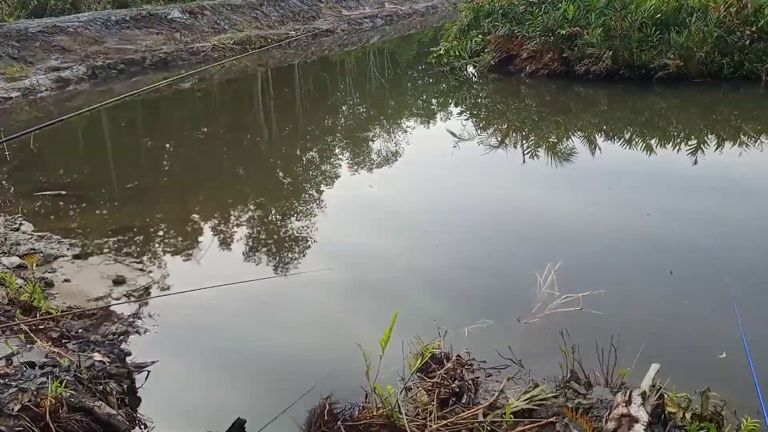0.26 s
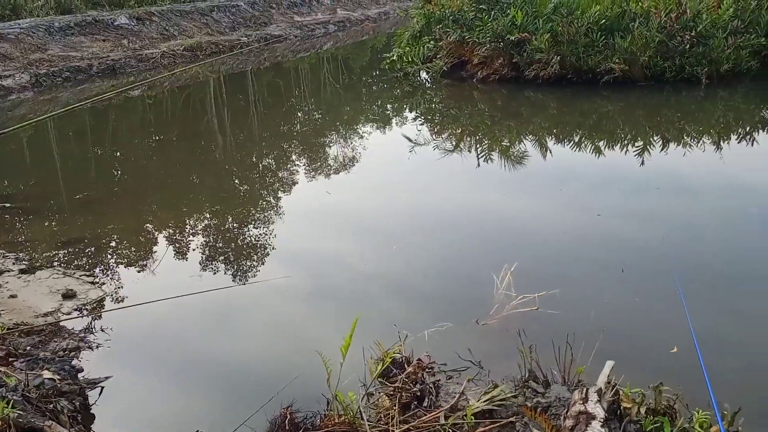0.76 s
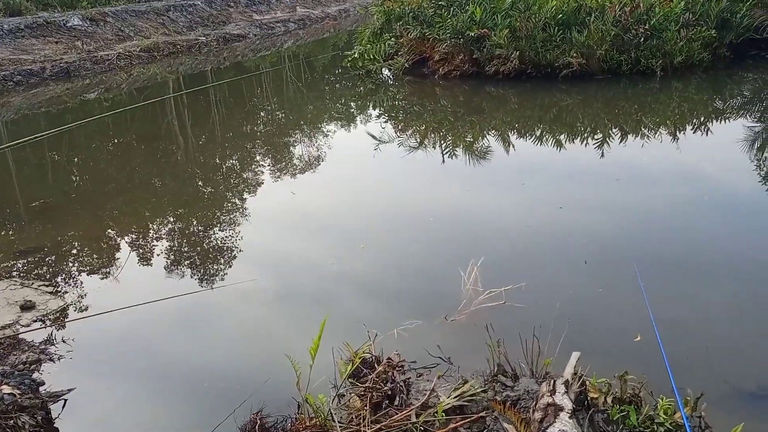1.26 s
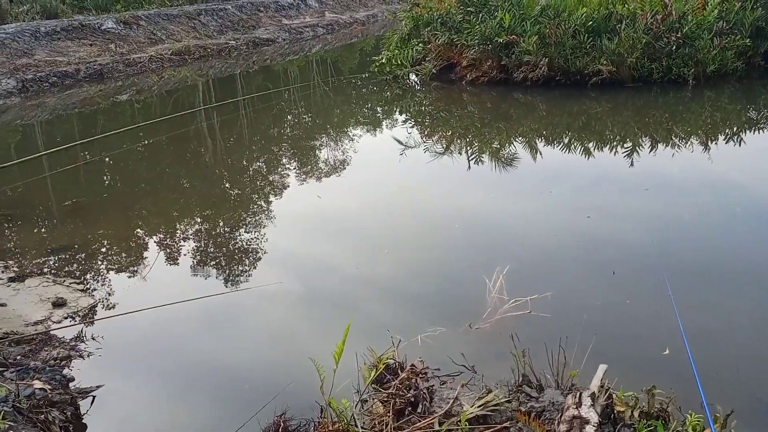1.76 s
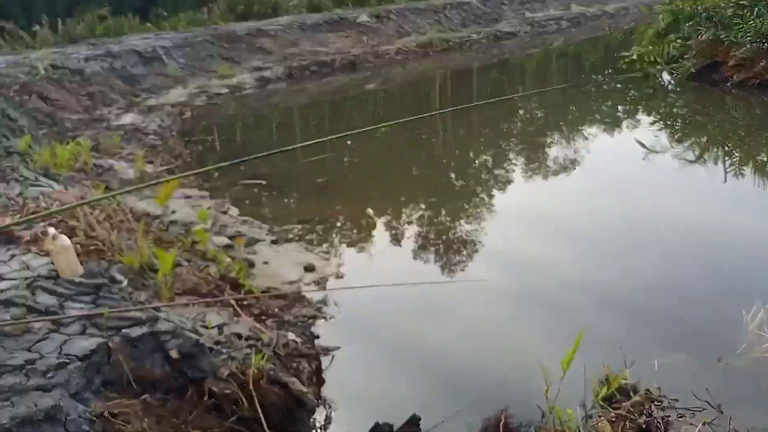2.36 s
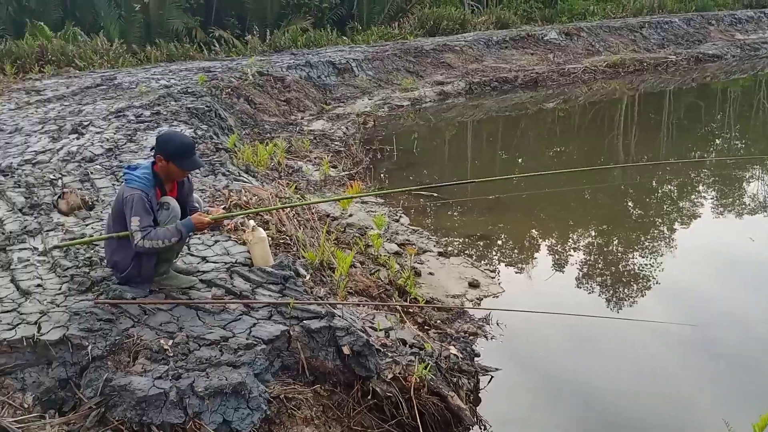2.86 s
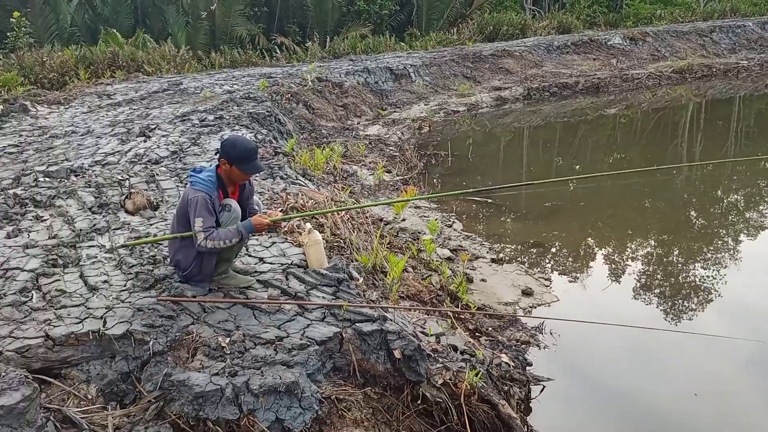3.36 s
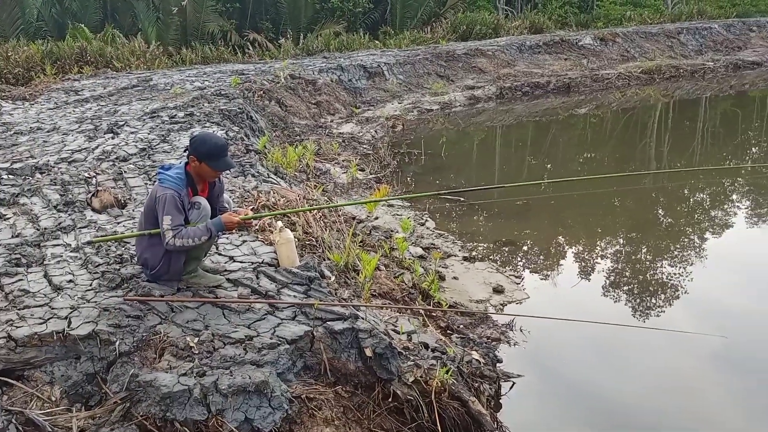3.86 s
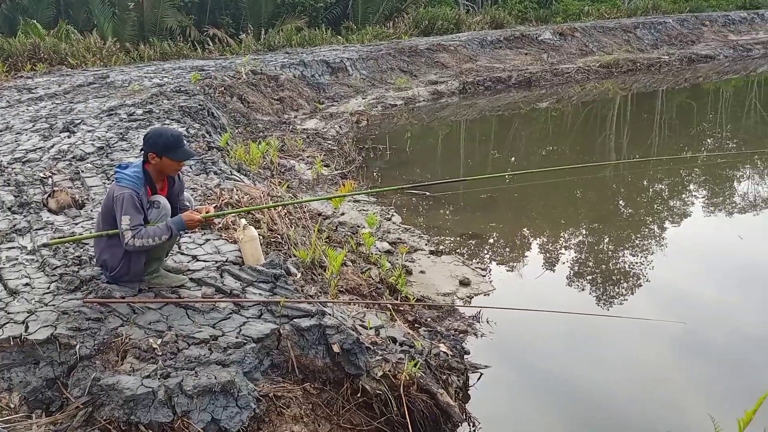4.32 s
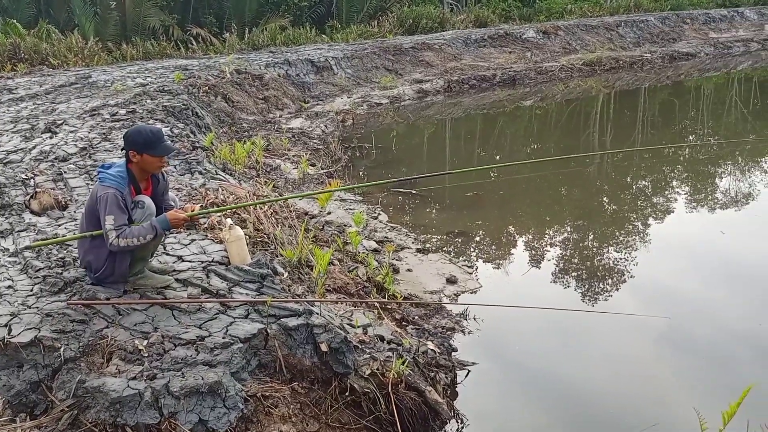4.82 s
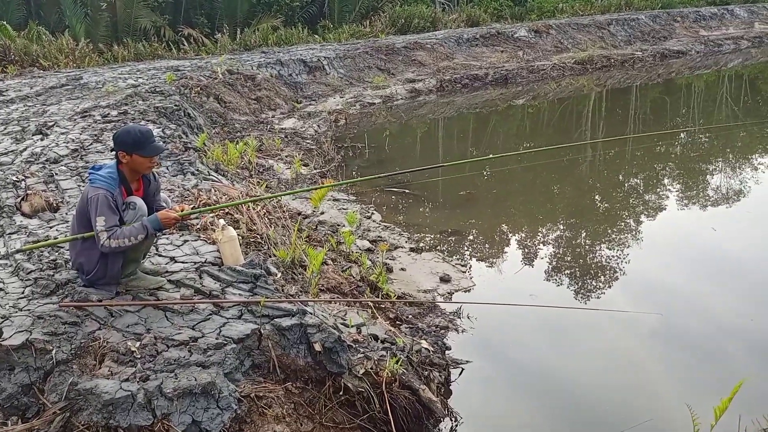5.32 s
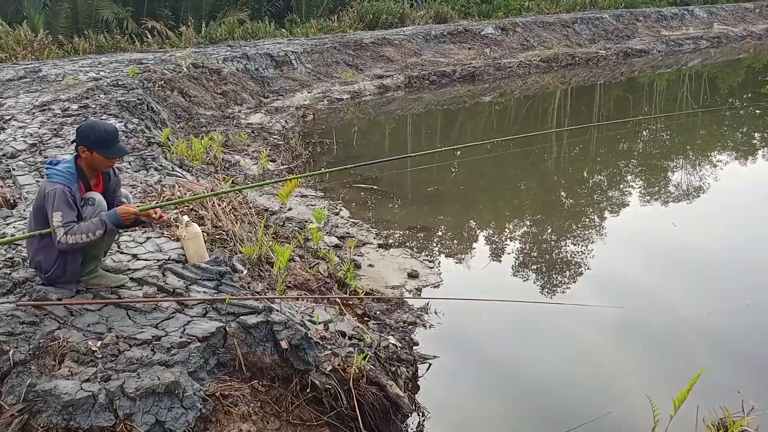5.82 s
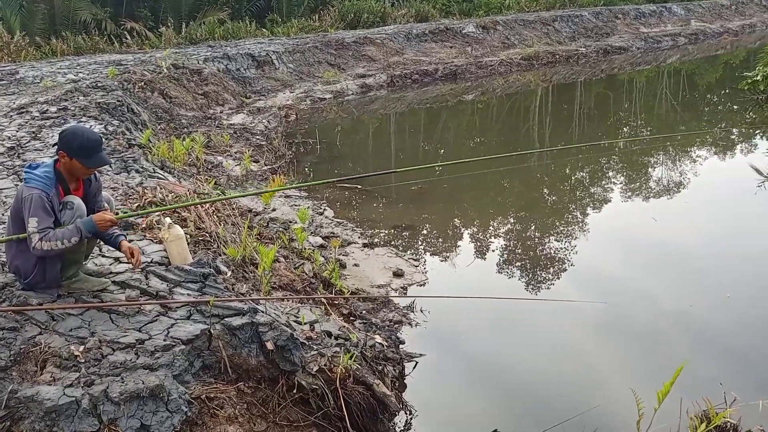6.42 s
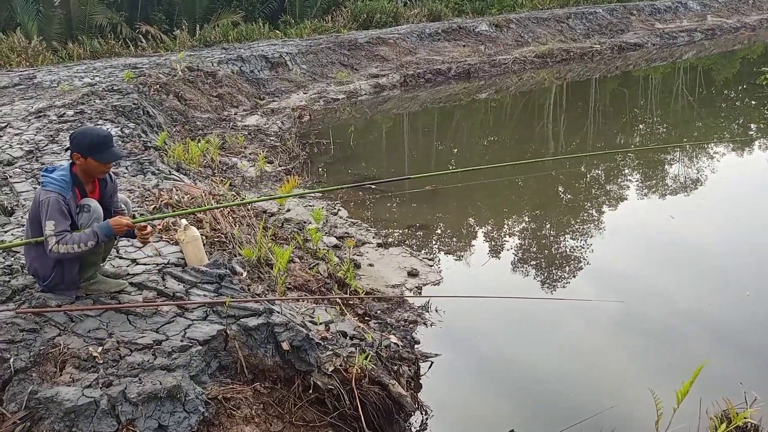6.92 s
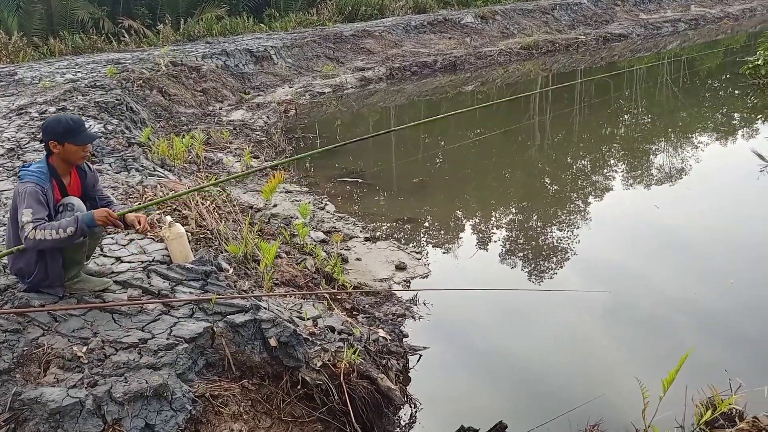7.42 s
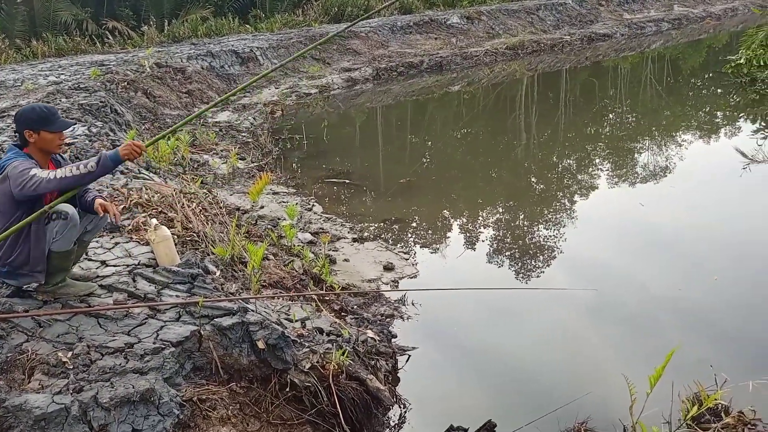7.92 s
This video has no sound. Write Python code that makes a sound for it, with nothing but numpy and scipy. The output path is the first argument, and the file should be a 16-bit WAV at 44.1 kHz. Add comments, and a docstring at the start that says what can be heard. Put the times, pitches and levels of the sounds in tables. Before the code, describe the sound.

Crickets trill faintly beside a pond at dusk, over a far insect chorus and soft, low air. A small bird gives two runs of quick double chirps with a pause between, echoing lightly off the banks. Fishing gear handled close to the microphone makes soft, dull knocks near the start and again at the end. A thin, very high buzz comes and goes, and distant birds whistle.

```python
"""Dusk at a fishing pond

Crickets trill near 3 kHz with their wings and hold long notes over a far insect chorus and soft air.
A thin buzz arches high in the treble; gear handled close to the microphone gives soft, dull knocks.
Far birds whistle, and a small bird's two runs of quick double chirps echo off the banks.
Two tiny, dry ticks fall near the end of the first run."""
import sys
import numpy as np
from scipy import signal
from scipy.io import wavfile
from scipy.ndimage import uniform_filter1d, map_coordinates

SR = 44100
rng = np.random.default_rng(int(sys.argv[2]) if len(sys.argv) > 2 else 0)


def materialize(psi):
    """Save the field psi as 16-bit PCM at rate SR to the path in sys.argv[1].

    A 1-D psi becomes a single channel; in a 2-D psi each row is a channel.
    """
    bounded = np.clip(np.atleast_2d(psi).T, -1, 1)
    quanta = np.round(bounded * 32767).astype(np.int16)
    wavfile.write(sys.argv[1], SR, quanta)


N = 360738
T = np.arange(N) / SR


def amp(db):
    """Decibels to gain."""
    return 10 ** (np.asarray(db) / 20)


def unit(x):
    """Scales to rms 1."""
    return x / np.sqrt(np.mean(x ** 2) + 1e-20)


def follow(rows, t):
    """Reads each column of a breakpoint curve at the times t."""
    times, *columns = np.transpose(rows)
    return [np.interp(t, times, column) for column in columns]


def read_spectrum(points, hz):
    """Reads a curve on a log-frequency axis."""
    point_hz, value = np.transpose(points)
    return np.interp(np.log(hz + 1), np.log(point_hz + 1), value)


def add(mix, start_s, sound):
    """Mixes a sound in at start_s, trimmed to fit."""
    start = round(start_s * SR)
    sound = sound[max(-start, 0):]
    part = mix[max(start, 0):][:len(sound)]
    part += sound[:len(part)]


def tone(hz):
    """A sine that follows a pitch curve."""
    return np.sin(2 * np.pi * (np.cumsum(hz) / SR + rng.random()))


def wander(t, per_s):
    """Smooth random modulation of rms about 1, through per_s new values a second."""
    knots = rng.standard_normal(2 ** 13)
    return map_coordinates(knots, [(t - t[0]) * per_s], order=2, mode="wrap")


def noise(gain, patchy_db):
    """Noise with the spectrum gain(hz) and drifting patches of level."""
    hz = np.fft.rfftfreq(2048, 1 / SR)
    real, imag, patches = rng.standard_normal((3, len(hz), N // 512 + 5))
    patches = uniform_filter1d(patches, size=20, axis=0)  # smooth across frequency
    patches = unit(uniform_filter1d(patches, size=8, axis=1))  # and across time
    spectrum = (real + 1j * imag) * gain(hz)[:, None] * amp(patchy_db * patches)
    return unit(signal.istft(spectrum, nperseg=2048, noverlap=1536)[1][:N])


# Decay of the echo from banks and bushes: frequency_hz, t60_s
BANK_DECAY = [(200, 0.25), (2600, 0.49), (5000, 0.66), (12000, 0.22)]

def bank_echo(dry, early_db, early_s):
    """Scattered echo: a quick flurry from near ground and leaves, then a long thin tail."""
    reflections = rng.standard_normal(SR) * (rng.random(SR) < 1 / 10)
    hz, t, spectrum = signal.stft(reflections, SR, nperseg=256)
    tail = amp(-60 * t / read_spectrum(BANK_DECAY, hz)[:, None])
    flurry = amp(early_db) * np.exp(-t / early_s)
    impulse = signal.istft(spectrum * (tail + flurry), SR)[1]
    return signal.fftconvolve(dry, impulse / np.linalg.norm(impulse))[:N]


# Tone colour of the air: frequency_hz, gain_db
AIR_SPECTRUM = [(20, -29), (42, -45), (65, 2.5), (110, 2), (300, -2.5), (600, -7.5), (1200, -11),
                (2400, -11), (3600, -22), (5000, -25.5), (10000, -36.5), (13200, -37), (15500, -55)]
# Fader ride on the air: time_s, gain_db
AIR_RIDE = [(0.0, -74.5), (0.55, -69.5), (0.84, -75), (1.93, -71.5), (2.25, -68), (3.8, -72.5),
            (4.01, -68.5), (4.21, -74), (5.38, -75), (6.06, -71), (7.93, -70), (8.18, -65)]

def air():
    """Soft, low wash of open air over the pond."""
    wash = noise(lambda hz: amp(read_spectrum(AIR_SPECTRUM, hz)), patchy_db=2.22)
    return amp(follow(AIR_RIDE, T)[0] + 8.5) * wash


# Trilling voices: pitch_hz, strokes_per_s, gain_db
TRILL_VOICES = [(2862, 28, -2), (2945, 56, -1), (3005, 57, -1), (3055, 56, -4)]
# Fader ride on the trill: time_s, gain_db
TRILL_RIDE = [(0.0, -57.5), (1.07, -65.5), (2.12, -59), (4.67, -64), (5.1, -65.5), (5.72, -62.5),
              (6.15, -64), (8.07, -67.5), (8.18, -71)]

def cricket_trill():
    """Each wing stroke is a short tone that sags in pitch; distance smears the strokes together."""
    trill = np.zeros(N)
    for hz, strokes_per_s, db in TRILL_VOICES:
        stroke_phase = np.cumsum(strokes_per_s * (1 + 0.0175 * wander(T, per_s=6))) / SR % 1
        pitch = hz * (1 + .002 * wander(T, per_s=9) - .012 * (stroke_phase - .5))
        pulses = np.sin(np.pi * stroke_phase) ** 2
        trill += amp(db + 2 * wander(T, per_s=5.8)) * pulses * tone(pitch)
    distant = trill + bank_echo(trill, early_db=19, early_s=0.0019)
    return amp(follow(TRILL_RIDE, T)[0] - 2.0) * unit(distant)


# Held cricket notes: start_s, length_s, start_pitch_hz, gain_db
LONG_NOTES = [(-.2, 0.69, 3034, -80.5), (1.032, 0.71, 3010, -81), (2.272, 0.7, 3023, -76),
              (3.496, 0.63, 3023, -77.5), (4.677, 0.79, 3030, -82), (5.982, 0.58, 3047, -74.5),
              (7.271, .62, 3003, -74.5)]
# Two detuned strands to a note, the upper one fainter: pitch_ratio, gain_db
LONG_NOTE_STRANDS = [(1, 0), (1.034, -10)]
# Harmonics of each strand: harmonic_number, gain_db
LONG_NOTE_HARMONICS = [(1, 11), (2, 3.5), (3, 2.5), (4, -1)]

def cricket_long_notes(waver_db=4.5):
    """A cricket repeats a long, wavering note whose pitch sinks slowly."""
    out = np.zeros(N)
    for start_s, length_s, hz, db in LONG_NOTES:
        t = np.arange(0, length_s, 1 / SR)
        for ratio, strand_db in LONG_NOTE_STRANDS:
            pitch = ratio * hz * (1 - 0.02 * t / length_s + 0.00084 * wander(t, per_s=76))
            strand = sum(amp(harmonic_db + waver_db * wander(t, per_s=19.5)) * tone(round(k) * pitch)
                         for k, harmonic_db in LONG_NOTE_HARMONICS)
            add(out, start_s, amp(db + strand_db - 3.0) * strand * signal.windows.tukey(len(t), .3))
    return out


# Hiss bands of the far insects: centre_hz, width_hz, gain_db
CHORUS_BANDS = [(2977, 114, -1.5), (2926, 340, -11), (3730, 450, -26), (5950, 270, -22.5), (6990, 240, -29),
                (8300, 100, -13.5), (8330, 540, -15.5), (11690, 360, -23), (14500, 360, -33)]
# Fader ride on the chorus: time_s, gain_db
CHORUS_RIDE = [(0, -74), (.55, -66.5), (.9, -73.5), (2.4, -68), (4.4, -72), (5.3, -73), (6.4, -68),
               (8.18, -68.5)]

def insect_chorus(swell_db=2, swell_s=0.49):
    """Countless far insects merge into bands of hiss that swell around each long cricket note."""
    def bands(hz):
        return np.sqrt(sum(amp(db) ** 2 * np.exp(-((hz - centre_hz) / width_hz) ** 2)
                           for centre_hz, width_hz, db in CHORUS_BANDS))
    hiss = noise(bands, patchy_db=1.4)
    swell = sum(np.exp(-((T - start_s - length_s / 2) / swell_s) ** 2)
                for start_s, length_s, _, _ in LONG_NOTES)
    return amp(follow(CHORUS_RIDE, T)[0] + swell_db * swell + 7.0) * hiss


BUZZ_REST_HZ = 8100  # every phrase leaves from this pitch and drops back to it

def buzz_contour(t, length_s, climb_s, top_hz, sag_hz, fade_db, fall_s=.1, build_s=.1):
    """Pitch and gain of one phrase: a quick climb, a sloping hold, a drop."""
    lift = np.clip(np.minimum(t / climb_s, (length_s - t) / fall_s), 0, 1)
    held = np.clip((t - climb_s) / (length_s - climb_s - fall_s), 0, 1)
    hz = BUZZ_REST_HZ + lift * (top_hz - sag_hz * held - BUZZ_REST_HZ)
    low_pitch_db = -2.5 * (1 - lift)
    attack_db = -5 * np.clip(1 - t / build_s, 0, 1)
    return hz, low_pitch_db + attack_db + fade_db * held


def buzz_squeaks(hz, length_s, per_s=1600, squeak_s=0.024, spread=0.13):
    """A cloud of tiny squeaks, each near the pitch curve and sliding its own way."""
    cloud = np.zeros(len(hz))
    ramp = np.linspace(-.5, .5, round(squeak_s * SR))
    count = round(per_s * length_s)
    centres = rng.integers(0, len(hz), count)
    for centre, (detune, slide, size) in zip(centres, rng.standard_normal((count, 3))):
        pitch = hz[centre] * (1 + spread * detune + 0.057 * slide * ramp)
        add(cloud, centre / SR - squeak_s / 2, amp(4 * size) * np.hanning(len(ramp)) * tone(pitch))
    return cloud


# Buzz phrases: start_s, length_s, climb_s, top_hz, sag_hz, gain_db, fade_db, fray_share_at_top
BUZZ_PHRASES = [(0.275, .59, 0.065, 13640, 1397, -62.5, -7.5, 0.26),
                (2.217, 0.5, 0.06, 13300, 2399, -64, -3.5, 0.35),
                (3.806, .48, 0.17, 12830, -300, -63.5, -3.5, 0.74),
                (5.475, 0.52, 0.061, 11680, 1102.5, -73, -1, 0.2),
                (7.277, 0.56, 0.12, 12900, 2597, -69, -6, 0.4)]
# Inharmonic strands of the buzz: pitch_ratio, gain_db
BUZZ_STRANDS = [(.72, 8), (0.828, 5), (.93, 0), (1, 22), (1.07, -3), (1.16, 1), (1.28, -2), (1.48, 8)]

def high_buzz(sway=0.023):
    """A very high whistle swings up and back down; its strands waver apart and fray into squeaks."""
    out = np.zeros(N)
    for start_s, length_s, climb_s, top_hz, sag_hz, db, fade_db, top_fray in BUZZ_PHRASES:
        t = np.arange(0, length_s, 1 / SR)
        hz, shape_db = buzz_contour(t, length_s, climb_s, top_hz, sag_hz, fade_db)
        clear = np.zeros(len(t))
        for ratio, strand_db in BUZZ_STRANDS:
            pitch = ratio * hz * (1 + sway * wander(t, per_s=24) + .003 * wander(t, per_s=700))
            flicker_db = 5 * wander(t, per_s=25) + 2 * wander(t, per_s=200)
            clear += amp(strand_db + flicker_db) * tone(pitch)
        # the higher the whistle, the more it frays
        fray = np.clip(top_fray * (hz - BUZZ_REST_HZ) / (top_hz - BUZZ_REST_HZ), 0, 1)
        phrase = np.sqrt(1 - fray) * unit(clear) + np.sqrt(fray) * unit(buzz_squeaks(hz, length_s))
        add(out, start_s, amp(db + shape_db + 1.9) * phrase * signal.windows.tukey(len(t), .1))
    return out


# Bumps of handled gear: start_s, gain_db, hardness_0_to_1
GEAR_KNOCKS = [(.349, -24, 0.15), (0.4301, -26, 0.4), (1.345, -45, 1), (1.612, -49, 0.2),
               (2.0581, -24.5, 1), (2.103, -27, 0.2), (2.1965, -25.5, 0.96), (2.5408, -26.5, 0.05),
               (2.5708, -24, 0.44), (6.542, -36, 0), (6.558, -38, 0), (7.1433, -21.5, 0.5),
               (7.367, -48, 0.8), (7.9818, -17.5, 0.43), (8.0196, -29, .25), (8.0504, -28.5, 0.14),
               (8.0764, -29, 0), (8.1111, -29, 0), (8.14, -28, 0), (8.175, -27, 0.1)]

def gear_knocks(ring_hz=84, ring_s=0.0082, rise_s=0.00027, glide_s=0.0026, sag_hz=40, sag_s=0.009,
                tick_hz=1200, tick_s=0.00029, firm_db=-30, light_hz_per_db=4.5):
    """A blow arrives highs first: a tick, a hollow body, then a short low ring that sags."""
    out, t = np.zeros(N), np.arange(SR // 10) / SR
    contact = np.exp(-(t / glide_s) ** 2)
    envelope = (0.94 * np.exp(-t / ring_s) + 0.027 * contact) * (1 - np.exp(-t / rise_s))
    tick = np.sin(2 * np.pi * tick_hz * t) * t / tick_s * np.exp(1 - t / tick_s)
    for start_s, db, hardness in GEAR_KNOCKS:
        settled_hz = ring_hz + light_hz_per_db * max(firm_db - db, 0)  # light touches ring higher
        glide_hz = (230 + 150 * hardness) * contact  # hard blows start higher
        cycles = np.cumsum(settled_hz + sag_hz * np.exp(-t / sag_s) + glide_hz) / SR
        body = np.sin(2 * np.pi * (cycles + .14)) * envelope
        add(out, start_s, amp(db) * (body + amp(-6) * hardness * tick))
    dull = signal.sosfilt(signal.butter(N=3, Wn=[42, 2100], btype="band", fs=SR, output="sos"), out)
    return dull + amp(-15) * bank_echo(dull, early_db=25, early_s=0.0088)


# Far bird calls: start_s, length_s, start_hz, middle_hz, end_hz, gain_db
BIRD_WHISTLES = [(0.589, 0.03, 4830, 4120, 4020, -63), (2.803, 0.095, 1760, 1920, 1980, -62),
                 (3.272, 0.03, 2130, 2217, 2160, -48), (3.626, 0.26, 1940, 1944, 1935, -63.5),
                 (5.495, 0.12, 5250, 5580, 5560, -76), (5.628, .017, 5000, 5600, 6230, -73),
                 (5.643, .077, 6450, 6500, 6700, -78), (7.626, 0.11, 4870, 5040, 5100, -83)]

def far_bird_whistles():
    """Soft slurred notes, blurred by distance."""
    out = np.zeros(N)
    for start_s, length_s, *pitches, db in BIRD_WHISTLES:
        t = np.arange(0, length_s, 1 / SR)
        hz = np.interp(t / length_s, [0, .5, 1], pitches) * (1 + 0.015 * wander(t, per_s=160))
        add(out, start_s, amp(db) * tone(hz) * signal.windows.tukey(len(t), .6))
    return amp(-5) * out + amp(-1.5) * bank_echo(out, early_db=10, early_s=.015)


# The small bird's double chirps: start_s, gain_db, first_top_hz, second_note_delay_s
DOUBLE_CHIRPS = [(1.067, -49, 2900, 0.035), (1.283, -47, 2890, 0.033), (1.524, -46.5, 2880, 0.033),
                 (1.768, -44, 2860, .036), (1.998, -43, 2850, 0.034), (2.237, -42.5, 2840, 0.035),
                 (2.494, -40, 2840, 0.036), (2.745, -40.5, 2850, .033), (2.993, -43.5, 2830, 0.032),
                 (3.247, -48.5, 2830, 0.036), (3.494, -49, 2840, 0.029), (3.777, -48.5, 2840, 0.028),
                 (5.9145, -42.5, 3150, .035), (6.084, -40, 2830, 0.039), (6.32, -38.5, 2830, .036),
                 (6.526, -38.5, 2820, 0.032), (6.768, -40.5, 2840, 0.034), (7.02, -40.5, 2810, 0.033),
                 (7.2549, -40.5, 2780, 0.031), (7.504, -40.5, 2750, 0.034), (7.768, -39, 2780, 0.031),
                 (8.034, -37.5, 2840, 0.033)]

def chirp_notes(second_rise=0.0421, full_db=-38):
    """Yields start_s, gain_db, top_hz for two notes a chirp, the second higher and stronger."""
    for start_s, db, top_hz, delay_s in DOUBLE_CHIRPS:
        first_db = db - 1 + .3 * (db - full_db)  # weaker still in soft chirps
        yield start_s, first_db, top_hz
        yield start_s + delay_s, db, top_hz * (1 + second_rise)


# Contour of one note: share_of_length, ratio_to_top_pitch, gain_db
NOTE_ARCH = [(-.02, .68, -17), (.09, .78, -6), (.24, .92, 3), (.48, 1.0, -5), (.62, .97, -3), (.86, .89, 7),
             (.96, .81, 1), (1.04, .68, -17)]
# Flick that leads into a note and, reversed, out of it: share_of_length, pitch_hz, gain_db
FLICK_CONTOUR = [(0, 2400, -17), (.3, 2650, -8), (.55, 3200, -11), (.8, 3850, -15), (1, 4300, -22)]
# Raspy strands of a flick: pitch_ratio, gain_db
FLICK_STRANDS = [(1.03, -3), (.9, -2), (.72, -9)]

def bird_chirps(note_s=.0255, flick_s=.015, lead_s=.012, trail_db=-1):
    """Each note is a pure arch of pitch, loudest on its shoulders, between two faint, raspy flicks."""
    arches, flicks = np.zeros((2, N))
    note_t = np.arange(NOTE_ARCH[0][0] * note_s, NOTE_ARCH[-1][0] * note_s, 1 / SR)
    bend, arch_db = follow(NOTE_ARCH, note_t / note_s)
    flick_t = np.arange(0, flick_s, 1 / SR)
    flick_hz, flick_db = follow(FLICK_CONTOUR, flick_t / flick_s)
    flick_envelope = amp(flick_db - 4) * signal.windows.tukey(len(flick_t), .2)
    for start_s, db, top_hz in chirp_notes():
        hz = top_hz * bend * (1 + 0.013 * wander(note_t, per_s=513))
        add(arches, start_s + note_t[0], amp(db + arch_db) * tone(hz))
        for offset_s, direction, trim_db in [(-lead_s, 1, 0), (note_s - .002, -1, trail_db)]:
            rasp = sum(amp(strand_db) * tone(ratio * flick_hz * (1 + .065 * wander(flick_t, per_s=800)))
                       for ratio, strand_db in FLICK_STRANDS)
            flick = amp(db + trim_db) * flick_envelope * rasp
            add(flicks, start_s + offset_s, flick[::direction])
    echo = amp(-4.5) * bank_echo(arches + 1.5 * flicks, early_db=7, early_s=.017)
    return amp(1.06) * (arches + flicks + echo)


# Dry ticks: start_s, gain_db
DRY_TICKS = [(3.495, -53), (3.7, -80)]

def dry_ticks(decay_s=0.008, centre_hz=9500, width_hz=6000):
    """Tiny snaps of noise, all treble."""
    out, t = np.zeros(N), np.arange(SR // 10) / SR
    hiss = noise(lambda hz: np.exp(-((hz - centre_hz) / width_hz) ** 2), patchy_db=0)[:len(t)]
    for start_s, db in DRY_TICKS:
        add(out, start_s, amp(db + 1.5) * hiss * np.exp(-t / decay_s))
    return out


def scene():
    """All sources at one microphone."""
    bed = air() + insect_chorus() + cricket_trill() + cricket_long_notes()
    events = high_buzz() + bird_chirps() + far_bird_whistles() + gear_knocks() + dry_ticks()
    return (bed + events)[None]


def record(dry):
    """The microphone sheds the deepest bass; the recorder cuts the very top."""
    high_pass = signal.butter(N=2, Wn=42, btype="high", fs=SR, output="sos")
    low_pass = signal.firwin(511, cutoff=15500, window=("kaiser", 9), fs=SR)
    return signal.oaconvolve(signal.sosfilt(high_pass, dry), low_pass[None], "same")


dry = scene()
out = record(dry)
materialize(out)
```